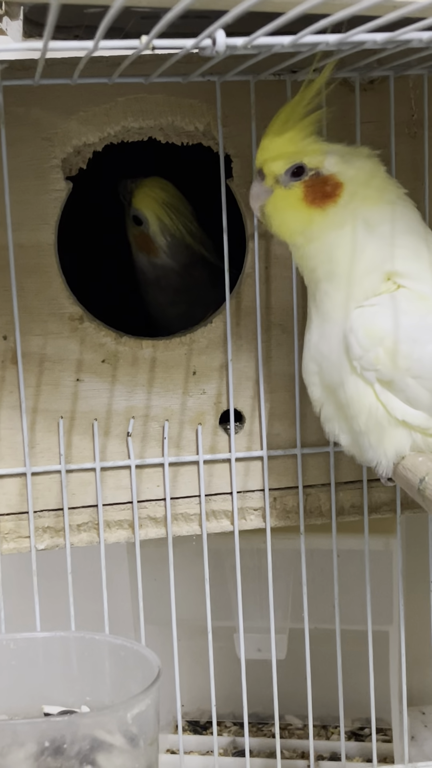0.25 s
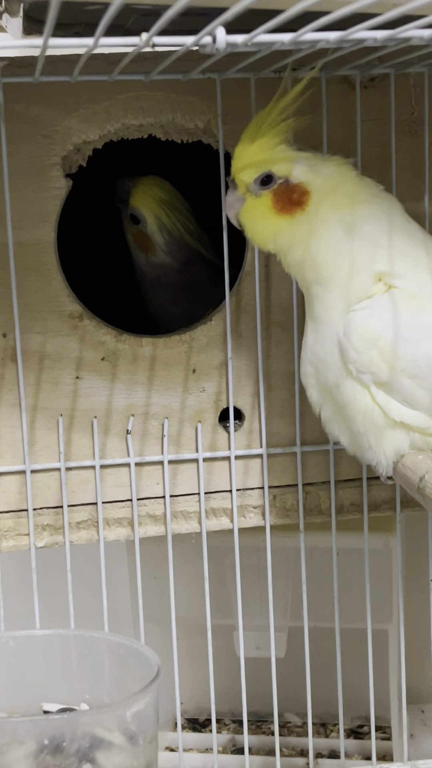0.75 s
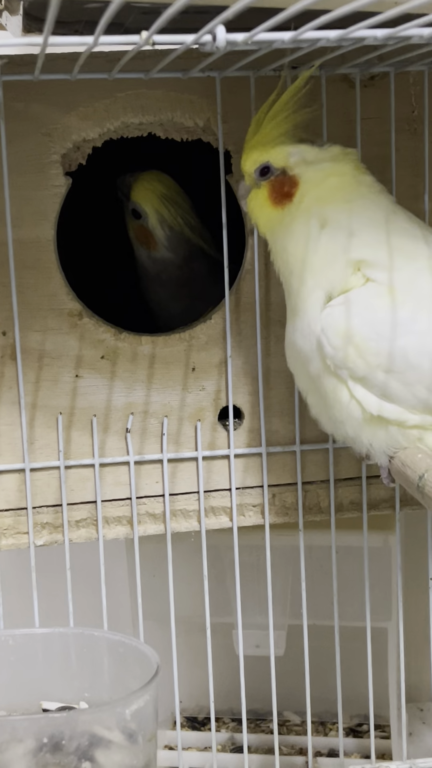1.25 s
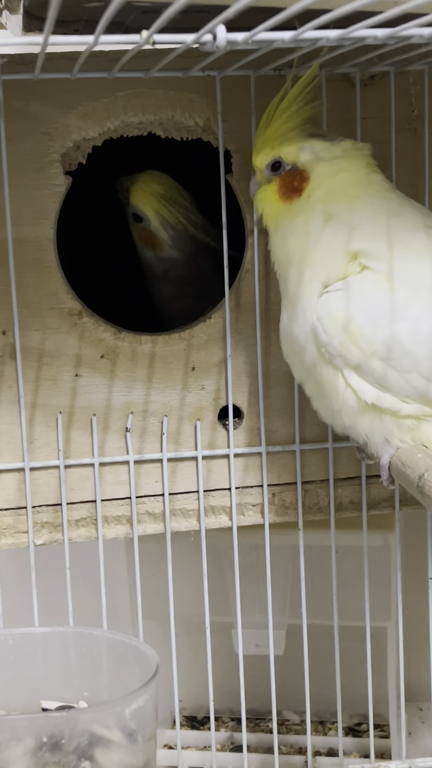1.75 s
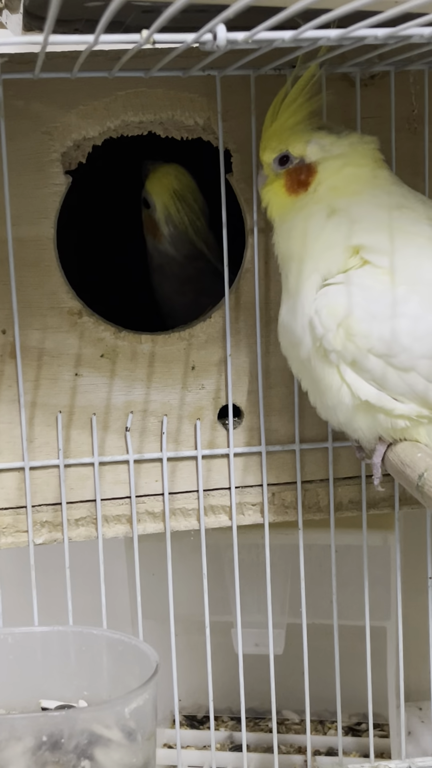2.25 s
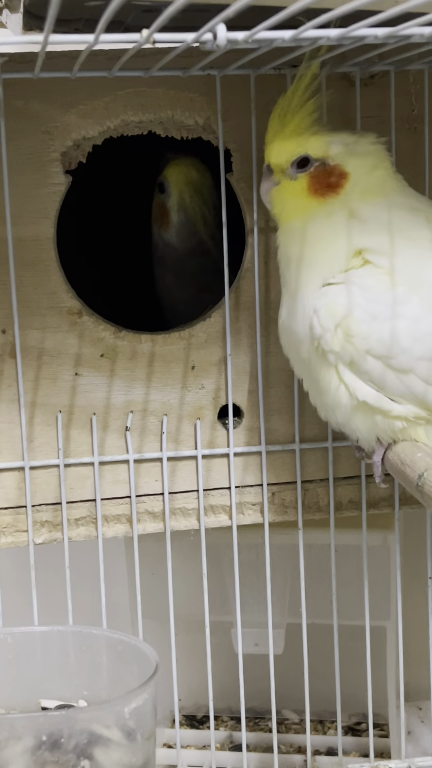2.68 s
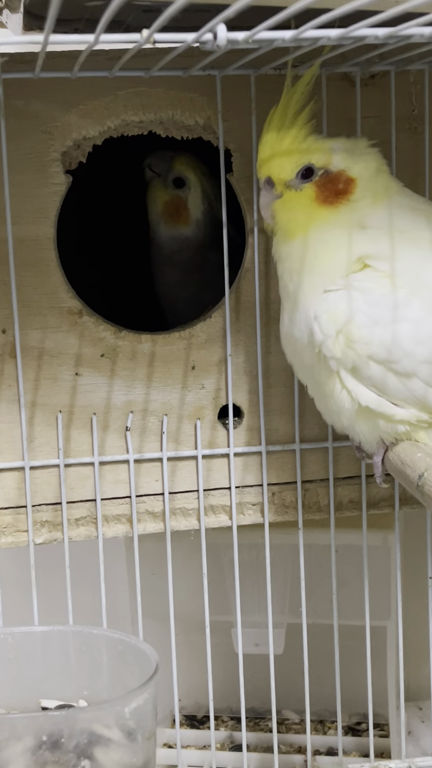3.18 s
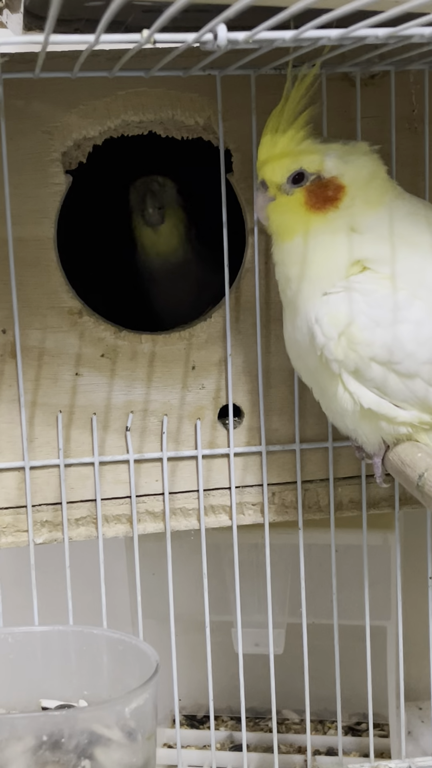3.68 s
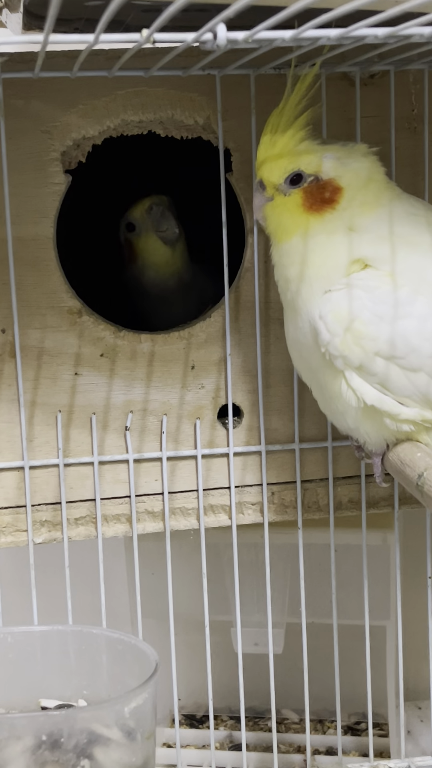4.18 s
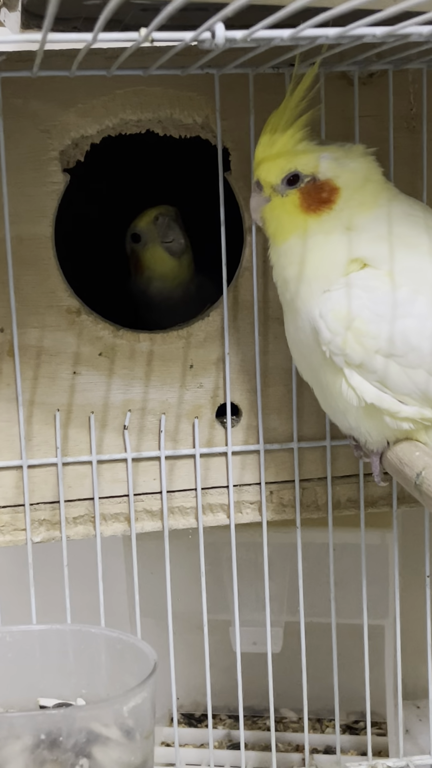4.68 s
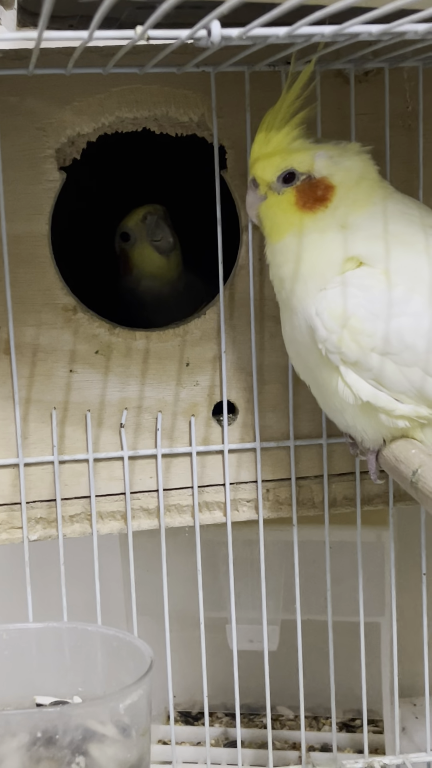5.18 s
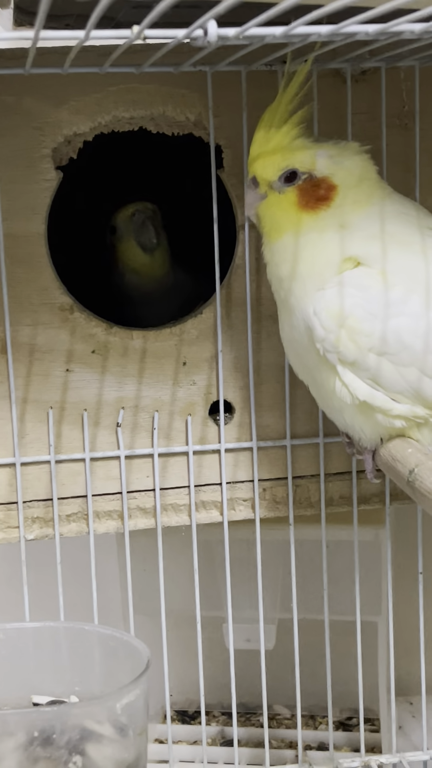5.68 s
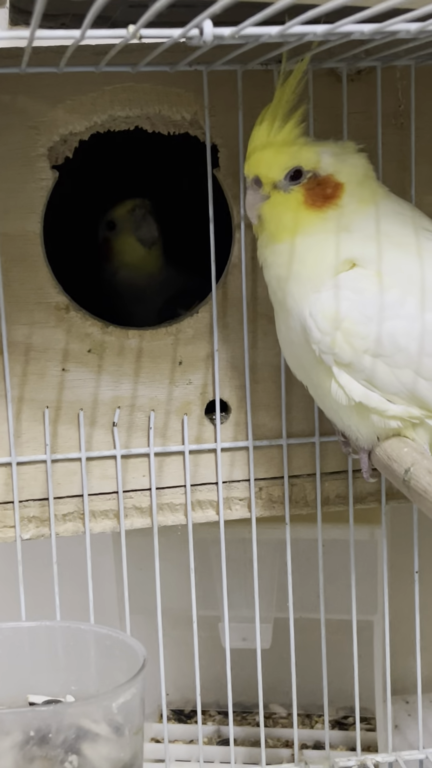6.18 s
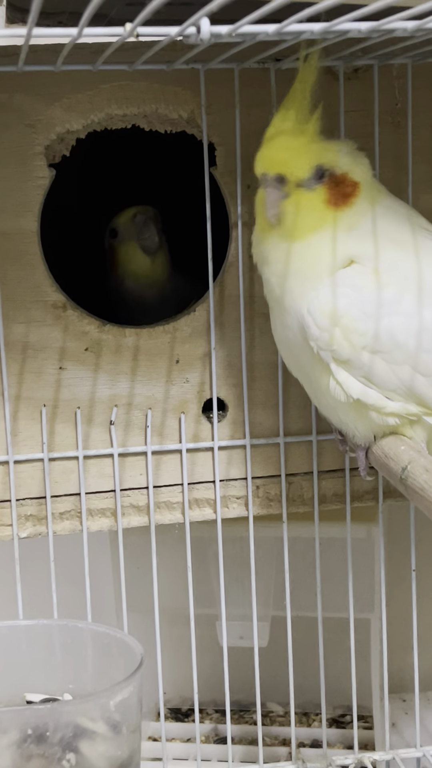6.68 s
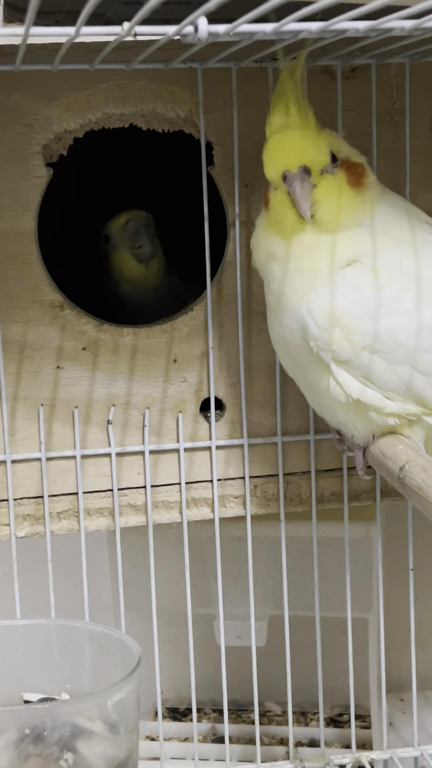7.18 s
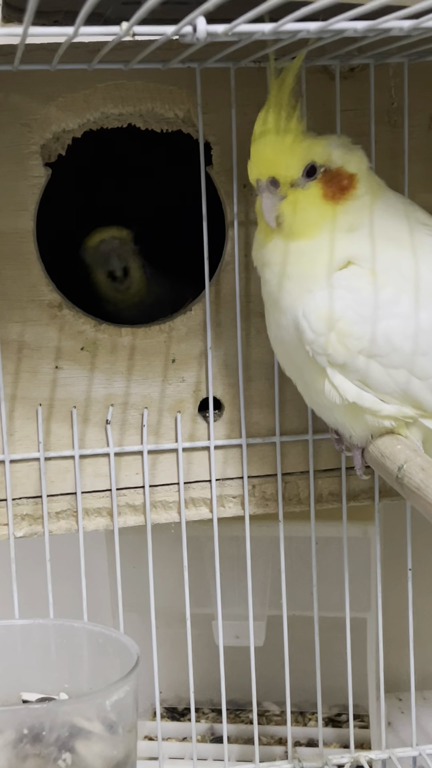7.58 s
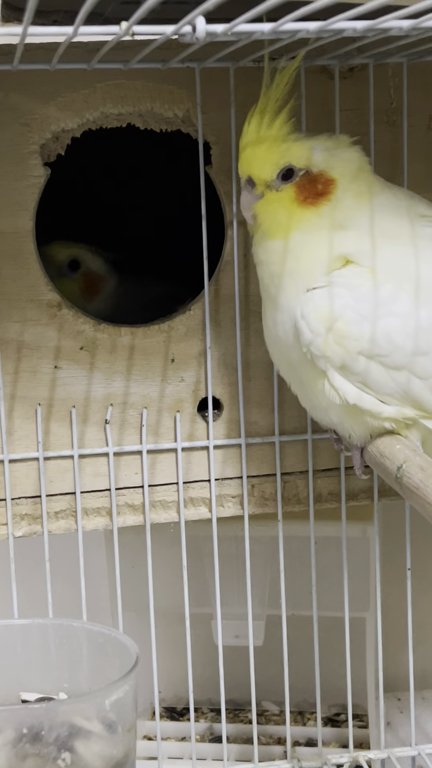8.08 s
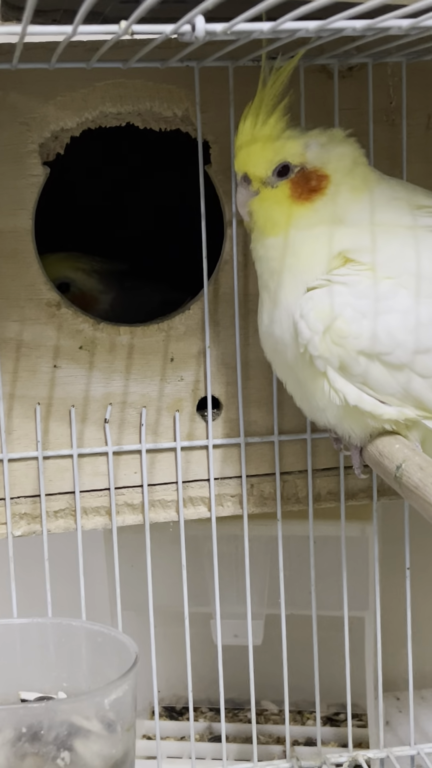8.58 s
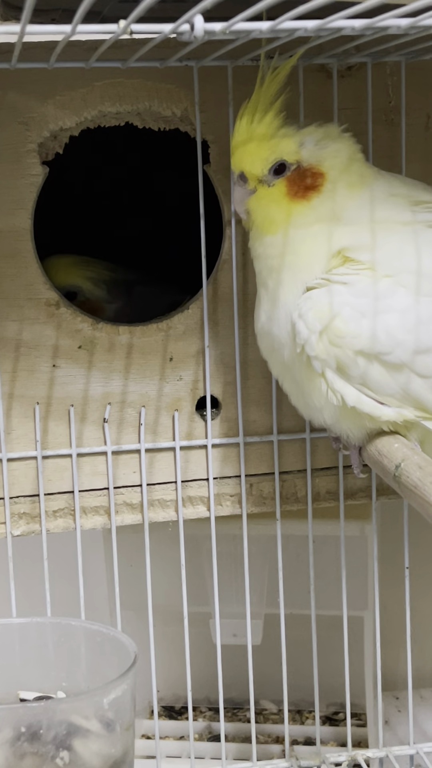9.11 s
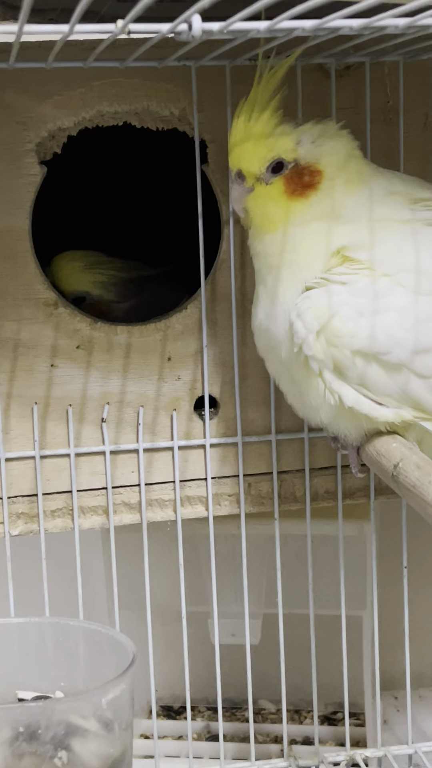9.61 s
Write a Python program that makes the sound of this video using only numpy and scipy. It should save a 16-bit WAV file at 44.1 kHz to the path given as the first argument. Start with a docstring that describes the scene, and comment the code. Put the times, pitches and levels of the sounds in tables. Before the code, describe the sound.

A cockatiel sings beside a wooden nest box in a wire cage, close to a stereo microphone in a hard-walled room. From 0 to about 5.1 seconds it delivers a steady run of short notes, roughly four a second: an opening high peep that collapses raspily downward, then scoops, falling slurs, bright ringing chirps and softer warbles, mostly gliding around 1.3 to 2.3 kHz. A higher peep comes at 4.7 with a dull scuff. From 5.1 to 6.4 the bird pauses; the room's ring fades over a low, wavering motor hum and soft air, with a faint distant low tone at the start. Singing resumes at 6.4; a small tick and feather rustle come around 6.8. Chirps at 7.5 to 8.4 are bright, with high peeps at 6.8, 7.7, 9.1 and 9.6. Another faint far-off low glide passes near 9 seconds. Song continues to the end.

```python
"""In a hard-walled room, at a wooden nest box in a wire cage, a cockatiel sings two runs of short notes.
There are about four a second: peeps, slurs, chirps, scoops and warbles. Each is one gliding tone with
overtones, and some start or break off in a rasp made of chopped noise. The room rings after them.
Light ticks, rustles and dull scuffs are shaped noise; two faint low tones glide by, far off.
Behind it all a motor hums in wavering low tones, over the soft noise of the still room."""
import sys
import numpy as np
from scipy import signal
from scipy.fft import rfft, irfft, next_fast_len
from scipy.io import wavfile
from scipy.ndimage import uniform_filter1d, map_coordinates

SR = 44100
rng = np.random.default_rng(int(sys.argv[2]) if len(sys.argv) > 2 else 0)


def dump(signal):
    """Clip the signal to [-1, 1] and save it as 16-bit WAV at the path in sys.argv[1]."""
    limited = np.clip(np.atleast_2d(signal).T, -1, 1)
    pcm = np.round(limited * 32767).astype(np.int16)
    wavfile.write(sys.argv[1], SR, pcm)


N = 434385
TIME = np.arange(N) / SR


def from_db(db):
    """Turn decibels into gain."""
    return 10 ** (np.asarray(db) / 20)


def rms_one(x):
    """Scale to an rms (average strength) of 1."""
    return x / np.sqrt(np.mean(np.abs(x) ** 2) + 1e-20)


def at_hz(points, hz):
    """Read a table between its points, with frequency on a log axis as the ear hears it."""
    at, value = np.transpose(points)
    return np.interp(np.log(np.maximum(hz, 1)), np.log(at), value)


def bins(size):
    """Frequencies in the spectrum of that many samples."""
    return np.arange(size // 2 + 1) * SR / size


def noise(colour):
    """Steady noise whose spectrum follows the colour table; rms 1."""
    size = next_fast_len(N)
    spectrum = rfft(rng.standard_normal(size))
    return rms_one(irfft(spectrum * from_db(at_hz(colour, bins(size))), size)[:N])


def drift(rate):
    """Smooth random wandering that changes about rate times a second; rms 1."""
    knots = rng.standard_normal(N // 40)
    return rms_one(map_coordinates(knots, [TIME * rate], order=3, mode="wrap"))


def bursts(events, rise_s, fall_s):
    """Loudness curve that swells and dies away at each event (t/s, level/dB)."""
    out = np.zeros(N)
    for s, level_db in events:
        start = max(int(s * SR), 0)
        age = TIME[:min(SR // 2, N - start)]
        rise = np.minimum(age / rise_s, 1)
        fall = np.exp(-np.maximum(age - rise_s, 0) / fall_s)
        out[start:start + len(age)] += from_db(level_db) * rise * fall
    return out


def ease(share):
    """Smooth step from 0 to 1."""
    return np.sin(np.pi / 2 * np.clip(share, 0, 1)) ** 2


def glide(s, pitch, fade_s):
    """One gliding tone: its samples, its pitch, its phase (pitch added up), and a gate with soft edges."""
    span = slice(max(int((s[0] - fade_s) * SR), 0), int((s[-1] + fade_s) * SR))
    t = TIME[span]
    hz = uniform_filter1d(np.interp(t, s, pitch), size=220, mode="nearest")
    gate = ease(np.minimum(t - t[0], t[-1] - t) / (2 * fade_s))
    return span, hz, 2 * np.pi * np.cumsum(hz) / SR, gate


# motor hum, one row per tone: (f/Hz, rms level before the swell/dB, unsteadiness 0-1)
HUM_TONES = [(36, -53, 0.09), (56.7, -46, 0.6), (82.7, -51, 0.8), (116, -46, 0.6), (186.5, -68.5, .6),
             (229.8, -52, .12), (296, -71, .5), (344.4, -66, .3)]
# the lowest hum tones swell and sink: (t/s, change of level/dB)
HUM_SWELL = [(0, -1.5), (1.5, 1.5), (3.2, -1), (4.8, 0), (7.6, -5), (9.8, 4.5)]


def motor_hum(waver_rate=14, swell_below_hz=100):
    """Low motor tones, each wavering in strength and phase."""
    out = np.zeros(N)
    swell_db = np.interp(TIME, *np.transpose(HUM_SWELL))
    for hz, level_db, unsteady in HUM_TONES:
        swing = rms_one(1 + unsteady * (drift(waver_rate) + 1j * drift(waver_rate)))
        turning = np.exp(2j * np.pi * (hz * TIME + rng.random()))
        tone = np.sqrt(2) * np.real(swing * turning)
        out += from_db(level_db + swell_db * (hz < swell_below_hz)) * tone
    return out


# colour of the still room's noise: (f/Hz, relative level per Hz/dB)
AIR_COLOUR = [(22, -20), (40, 0.5), (90, -5.5), (135, -4.5), (180, -13.5), (300, -18), (500, -24),
              (1000, -31), (2400, -37), (3500, -50), (7000, -53.5), (10000, -74), (15000, -80)]
# how alike left and right are in that noise: (f/Hz, likeness from -1 to 1)
LIKENESS = [(100, 1), (300, 0.97), (600, 0.7), (1500, 0.14), (8000, 0.72)]


def still_air(level_db=-49):
    """Dull room noise, alike in both channels in the bass and less so higher up."""
    size = next_fast_len(N)
    alike = np.clip(at_hz(LIKENESS, bins(size)), -1, 1)

    def part(share):
        return irfft(rfft(noise(AIR_COLOUR), size) * np.sqrt(share), size)[:N]

    mid, side = part((1 + alike) / 2), part((1 - alike) / 2)
    return from_db(level_db) * np.array([mid + side, mid - side])


# The five kinds of note. Each glides from an entry pitch to a turning pitch, on to a late pitch,
# then hooks off to its end pitch. Levels are relative: shape and resonances are added later.
# Columns of all five: (start t/s, length/s, entry f/Hz, turning f/Hz, late f/Hz, end f/Hz,
#   share of the length at the turn, fundamental level/dB, its swell over the note/dB, octave level/dB,
#   its swell/dB, its bloom in mid-note/dB, lift of the middle overtones/dB, lift of the highest/dB)
# high, almost pure peeps
PEEPS = [(0.001, 0.062, 2558, 2780, 2686, 2600.0, 0.53, -14.5, -9, -35.5, -7, 9.5, 4.5, 7),
         (4.735, 0.1, 2194, 2385, 2830, 2730, 0.13, -17, -11.5, -29.5, -2.0, 8, -7, 4),
         (6.845, 0.068, 2770, 2462, 2980, 2640.0, 0.23, -14.5, 2, -30, -21, -4, -3.5, -1),
         (7.73, 0.098, 2385, 2395, 2801, 2555, 0.13, -15.0, 6.5, -47, 10, -4, 12, 7.5),
         (9.06, 0.078, 2163, 2474, 2801, 2750.0, 0.3, -24.5, 16.5, -43, 12.5, 11, -6, -4),
         (9.647, 0.079, 2290, 2493, 2770, 2810, 0.3, -23, 3, -43, 2.5, 14.5, -9, -2)]
# slurs that mostly fall
SLURS = [(0.398, 0.1, 1597, 1504, 1316, 1294, 0.35, -21.5, 1, -26, -8.5, 4, -8, 4.5),
         (1.728, 0.11, 2168, 1629, 1372, 1260, 0.37, -23.5, 6, -45, 3.5, 17.5, -2.5, 19),
         (2.17, 0.091, 1528, 1357, 1302, 1427, 0.67, -23, 1.5, -25.5, -1, -1.5, -11.5, 6),
         (3.662, 0.11, 1514, 1646, 1337, 1412, 0.18, -26, 2.5, -37.0, -7.0, 1, 3.5, -7),
         (4.988, 0.11, 1633, 1481, 1362, 1654, 0.6, -28.0, -9.5, -42.5, 6.5, 12, 0.5, -4.0),
         (6.38, 0.05, 1518, 1522, 1392, 1558, 0.42, -31, -3.5, -26.5, 1, 7, 4, -11.0),
         (7.298, 0.098, 1565, 1456, 1332, 1425, 0.39, -24.5, -6.5, -22, -5, 1.5, 1.5, -5.0),
         (8.852, 0.12, 1832, 1655, 1527, 1734, 0.47, -25.5, 9, -25, -11.5, 8, 2, -5),
         (9.443, 0.12, 1800, 1560, 1336, 1305, 0.44, -24, -1, -38.5, -6.5, 22.5, -2, 10)]
# loud, bright chirps that settle on a held pitch
CHIRPS = [(0.598, 0.086, 1677, 1807, 1787, 1790, 0.54, -23.5, 13, -17, 15.0, 10, -1.5, 3.5),
          (2.376, 0.086, 2055, 1795, 1810, 1768, 0.38, -20, 9, -14, 12, -0.5, -0.5, -3.5),
          (2.792, 0.11, 2344, 1771, 1878, 1618, 0.25, -19, 2, -20.5, 24.5, -1, -5.5, 5.5),
          (4.298, 0.087, 1878, 1836, 1851, 1824, 0.28, -24, -8.5, -7.5, -5, 14, 6, -2),
          (7.508, 0.088, 2080, 1842, 1973, 2010.0, 0.37, -20.0, -4.0, -6.5, -12.5, 3.5, 6, -6),
          (7.98, 0.14, 1993, 1809, 2010, 1720.0, 0.48, -28.5, -6.5, -20, -33.5, 10.5, 8, -8.5),
          (8.406, 0.094, 2054, 1867, 1854, 1744, 0.5, -29, -20.5, -15, 4, 2, 9.5, 0.5)]
# scoops that mostly dip and climb again
SCOOPS = [(0.15, 0.1, 1598, 1564, 1771, 1720, .25, -27.5, 10.5, -54, -5, -6, 2, 14),
          (1.038, 0.08, 1784, 1626, 1743, 1728, .5, -26, -13.5, -19.5, 24, 7, -2.5, 4.5),
          (1.497, 0.13, 1783, 1592, 1833, 1702, .2, -23.5, 10, -20.5, -25, 17, -8, 8),
          (1.95, 0.086, 1627, 1735, 1681, 1616, .63, -22.5, 3.5, -32.5, 2.5, 3.5, -6.5, 13),
          (3.45, 0.129, 2216, 1595, 1654, 1793, .22, -25.5, -1.5, -26, 4, 0, 8, 6),
          (3.877, 0.104, 2186, 1544, 1722, 1756, .19, -24, 3, -25, 18, 3.5, 12, -0.5),
          (6.568, 0.13, 1697, 1577, 1730, 1700, .17, -24.5, -1, -22, -15.5, 7, 4.5, -2),
          (7.018, 0.12, 1810, 1670, 1887, 1740, .2, -24.5, -5, -31, -8.5, 12, -4.5, 5)]
# soft warbles between the louder notes
WARBLES = [(0.853, 0.1, 1830, 1589, 1595, 1700, .32, -30, -9, -58.5, -3, 1, 2, 14),
           (1.3, 0.094, 1930, 1702, 1923, 1684, .48, -23.5, -1.5, -52, 4, 0, -5, 13.5),
           (2.62, 0.097, 2230, 1768, 1826, 1770, .46, -25, 0.5, -52.5, 3, 0, 0, 14.5),
           (3.045, 0.098, 1880, 1377, 1508, 1920, .26, -24.5, -2, -61, 0.5, -10, -2.5, 8),
           (3.235, 0.11, 2280, 1957, 2193, 1990, .26, -20, 5.5, -26, 3, 19, 1.5, 13.5),
           (4.122, 0.099, 2234, 1740, 2010, 1770, .45, -24.5, -2.5, -46.5, -5.5, 1.5, 5, 5),
           (4.55, 0.106, 1900, 1495, 1915, 2160, .52, -28.5, 0.5, -56.5, 0, -13, 2.5, 0),
           (8.213, 0.1, 1400, 1270, 1387, 1340, .41, -26.5, -1.5, -59, 18, -2, -9, -5),
           (8.643, 0.075, 2300, 2216, 2190, 1630, .4, -32, 4.5, -58.5, 3.5, -7.5, 6.5, 7),
           (9.285, 0.091, 2330, 1760, 1630, 1680, .5, -35.5, -1, -58, -14.5, 0, 11, 11)]
# attack, hold and release of each kind: (share of the length, fundamental level/dB, octave level/dB)
PEEP_SHAPE = [(0.0, -15.5, -8), (0.12, -9, -13.5), (0.3, 0.5, -8), (0.6, -4, 0.0), (0.85, -3.0, -0.5),
              (1.0, -18.5, -7.5)]
SLUR_SHAPE = [(0.0, -12.5, -7.5), (0.12, -8, 0.0), (0.3, -1, -0.5), (0.6, -0.5, -4), (0.85, -2.5, -14.0),
              (1.0, -8.5, -24)]
CHIRP_SHAPE = [(0.0, -12, -24), (0.12, -5.5, -10.0), (0.3, -1, -1.0), (0.6, 1, 1.5), (0.85, 0.5, -1),
               (1.0, -19.0, -20)]
SCOOP_SHAPE = [(0.0, -11.5, -15.0), (0.12, -6.5, -8), (0.299, -4.5, 0.5), (0.6, -1.5, -2), (0.85, -1, -8.5),
               (1.0, -14.5, -12.5)]
WARBLE_SHAPE = [(0.0, -16.5, -1.5), (0.12, -11, -4), (0.301, -5.0, -2.5), (0.599, 0.5, -1),
                (0.85, -4.5, -1.5), (1.0, -11, -9)]
# the voice catches for an instant: (t/s, dip of the pitch as a share, dip of the level/dB)
CATCHES = [(1.058, 0, 4), (1.608, -.04, 9), (1.795, 0.00081, 7), (2.804, -0.0015, 10), (3.277, .02, 13.5),
           (4.767, 0.087, 4), (6.863, 0.018, 6), (7.76, .03, 3), (9.104, 0.033, 9.5), (9.684, 0.029, 3.5)]


def song(grid_size=80, hook_share=.8, catch_s=0.0038):
    """Each note as times, pitch, levels of fundamental and octave, and the two overtone lifts."""
    share = np.linspace(0, 1, grid_size)
    # the closing hook begins at hook_share of the note
    hook = np.clip((share - hook_share) / (1 - hook_share), 0, 1) ** 2
    catch_at, catch_dip, catch_db = np.transpose(CATCHES)
    kinds = [(PEEPS, PEEP_SHAPE), (SLURS, SLUR_SHAPE), (CHIRPS, CHIRP_SHAPE),
             (SCOOPS, SCOOP_SHAPE), (WARBLES, WARBLE_SHAPE)]
    for notes, shape in kinds:
        at, first_shape, second_shape = np.transpose(shape)
        for (start, length, entry_hz, turn_hz, late_hz, end_hz, turn,
             first_db, first_swell, second_db, second_swell, bloom, middle_db, top_db) in notes:
            s = start + length * share
            onward = (share - turn) / max(hook_share - turn, 1 / grid_size)
            pitch = entry_hz + (turn_hz - entry_hz) * ease(share / turn)
            pitch += (late_hz - turn_hz) * ease(onward) + (end_hz - late_hz) * hook
            first = first_db + first_swell * (share - .5) + np.interp(share, at, first_shape)
            second = second_db + second_swell * (share - .5) + np.interp(share, at, second_shape)
            second -= bloom * (2 * share - 1) ** 2
            caught = np.exp(-((s[:, None] - catch_at) / catch_s) ** 2)
            dip_db = caught @ catch_db
            yield s, pitch * (1 - caught @ catch_dip), first - dip_db, second - dip_db, middle_db, top_db


# throat and beak, as they colour the overtones above the octave: (f/Hz, level/dB)
THROAT = [(3800, -31), (4400, -5), (4900, -28.5), (5500, -13.5), (6300, -22.5), (7300, -16.5), (8200, -34),
          (9200, -52.5), (10200, -31), (11200, -23), (12400, -31), (13800, -27), (15500, -34)]
# resonances of beak and nest box that fundamental and octave slide through: (f/Hz, level/dB)
BOX = [(1200.0, -24), (1330.0, 1), (1480.0, -11), (1620.0, 3), (1800.0, 5.5), (1950.0, -2), (2100.0, 6.5),
       (2330.0, -2.3), (2490.0, -3), (2620.0, 10), (2900.0, 5.5), (3120.0, 9), (3300.0, 6), (3500.0, 2.5),
       (3680.0, 0.7), (3900.0, -2.3), (4300.0, -3.5)]
# colour of the air in the voice, and of the rasp: (f/Hz, relative level per Hz/dB)
RASP_COLOUR = [(400, -30.5), (900, -23), (1300, -0.5), (2600, 3), (3800, -2), (4900, -13.5), (6000, -12),
               (7600, -21), (9200, -59), (11500, -46.5), (15000, -61)]


def whistle(fade_s=0.0022, jitter_rad=0.15, weak_jitter_rad=0.28, steady_db=-22, sag=0.022, sag_s=0.0028,
            wander=0.0057, wander_rate=60, shimmer_db=2.34, overtone_flutter_db=4.0, slope_db=-5.5,
            fundamental_db=0.22, octave_db=-0.3, air_db=-54, full_drive_db=2.5,
            middle_fade=.08, top_fade=0.69, top_hz=9000, count=8):
    """The voice organ makes one gliding tone per note; its partials swell as they cross the resonances."""
    out, effort = np.zeros(N), np.zeros(N)
    waver, shake, stray = jitter_rad * drift(180), drift(420), wander * drift(wander_rate)
    flutter = [drift(130) for k in range(count)]
    for s, pitch, first_db, second_db, middle_db, top_db in song():
        span, hz, phase, gate = glide(s, pitch, fade_s)
        t = TIME[span]
        # the pitch strays a little and sags as the pressure ends
        end_sag = sag * np.exp(np.minimum(t - s[-1], 0) / sag_s)
        hz = hz * (1 + stray[span] - end_sag)
        first = np.interp(t, s, first_db) + at_hz(BOX, hz) + fundamental_db
        second = np.interp(t, s, second_db) + at_hz(BOX, 2 * hz) + octave_db
        # a weakly blown tone shakes
        weakness = np.clip((steady_db - np.maximum(first, second)) / 10, 0, 1)
        phase = 2 * np.pi * np.cumsum(hz) / SR + waver[span] + weak_jitter_rad * weakness * shake[span]
        levels = [first + shimmer_db * flutter[0][span], second + shimmer_db * flutter[1][span]]
        # upper overtones grow with the lower two; the highest fade most away from the note's height
        drive = (first + second) / 2
        slack_db = np.maximum(drive.max() - drive - full_drive_db, 0)
        middle_lift, top_lift = middle_db - middle_fade * slack_db, top_db - top_fade * slack_db
        for k, wobble in enumerate(flutter[2:], 3):
            lift = np.where(k * hz < top_hz, middle_lift, top_lift)
            colour = at_hz(THROAT, k * hz) + lift
            levels.append(drive + slope_db * (k - 3) + colour + overtone_flutter_db * wobble[span])
        for k, level_db in enumerate(levels, 1):
            strength = uniform_filter1d(from_db(level_db), size=110, mode="nearest")
            out[span] += gate * strength * np.sin(k * phase) * (k * hz < SR / 2)
        effort[span] = gate * np.sqrt(from_db(first) + from_db(second))
    breath = from_db(air_db) * effort * noise(RASP_COLOUR)
    return out + breath


# the voice turns rough: (t/s, level/dB)
RASPS = [(0.06, -31.5), (1.732, -45.5), (3.45, -33), (3.664, -29.5), (3.879, -39.5), (4.55, -34.5),
         (4.827, -32.5), (4.998, -33), (5.084, -46), (6.845, -34), (7.83, -35), (9.655, -40)]


def rasp(onset_db=-36, onset_follows=.55, flap_hz=620, flap_spread=0.25, depth=0.28):
    """As a note starts or breaks, the membranes flap unevenly and chop the air into puffs."""
    onsets = []
    for s, pitch, first, second, *lifts in song():
        loudest_db = np.maximum(first, second).max()
        onsets.append((s[0], onset_db + onset_follows * loudest_db))
    envelope = bursts(RASPS, rise_s=0.0066, fall_s=0.0084) + bursts(onsets, rise_s=0.0027, fall_s=0.013)
    uneven_hz = flap_hz * (1 + flap_spread * drift(200))
    flaps = 1 + depth * np.sin(2 * np.pi * np.cumsum(uneven_hz) / SR)
    return envelope * rms_one(flaps * noise(RASP_COLOUR))


# some high notes end by collapsing about an octave: (t/s, level/dB)
COLLAPSES = [(0.062, -31), (7.826, -38.5)]


def collapses(length_s=.025, from_hz=2650, to_hz=1210, glide_s=0.0078, octave_db=-19):
    """The tension lets go at the end of a peep and the tone plunges."""
    out, age = np.zeros(N), TIME[:int(length_s * SR)]
    pitch = to_hz + (from_hz - to_hz) * np.exp(-age / glide_s)
    for s, level_db in COLLAPSES:
        span, hz, phase, gate = glide(s + age, pitch, fade_s=0.001)
        tone = np.sin(phase) + from_db(octave_db) * np.sin(2 * phase)
        out[span] += gate * from_db(level_db) * tone
    return out


# feathers and feet rustle as the bird shifts: (t/s, level/dB)
RUSTLES = [(0.1, -50.5), (2.02, -53.5), (3.12, -56), (3.88, -55), (4.78, -52), (5.85, -75), (6.8, -49),
           (7.1, -58), (8.85, -66.5)]


def rustle(grain_db=3.2, grain_rate=120):
    """Soft, uneven brushing in the middle treble: noise whose level flickers."""
    # (f/Hz, relative level per Hz/dB)
    colour = [(500, -8), (1000, -11.5), (2000, -1), (3000, 0.0), (6300, -10), (7800, -15), (9300, -45)]
    grain = from_db(grain_db * drift(grain_rate))
    return bursts(RUSTLES, rise_s=0.055, fall_s=0.11) * grain * noise(colour)


# light ticks of beak or claw: (t/s, level/dB)
TICKS = [(0.136, -44.5), (6.808, -37), (7.137, -45)]
# their colour: (f/Hz, relative level per Hz/dB)
TICK_COLOUR = [(500, -15.5), (1500, -6), (4000, -6), (6200, -0.5), (8000, -10.5), (9300, -42),
               (15000, -44.5)]


def ticks():
    """Small hard contacts that die within milliseconds."""
    return bursts(TICKS, rise_s=.0005, fall_s=0.0046) * noise(TICK_COLOUR)


# the voice cracks down to about half its pitch: (t/s, level/dB)
CRACKS = [(1.626, -44), (8.112, -46), (1.733, -43), (2.265, -46), (2.626, -46.5), (3.045, -39),
          (3.118, -44.5), (3.668, -41.5), (4.122, -48.5), (4.566, -36.5), (5.0, -44.5), (5.08, -48),
          (7.128, -45), (8.648, -46.5), (9.286, -49), (9.548, -51.5)]


def cracks(half_pitch_hz=1130, unsteady=.04, third_db=-3):
    """For a moment every second swing differs, which sounds the half pitch and its third harmonic."""
    phase = 2 * np.pi * np.cumsum(half_pitch_hz * (1 + unsteady * drift(250))) / SR
    odd = np.sin(phase) + from_db(third_db) * np.sin(3 * phase)
    return bursts(CRACKS, rise_s=0.0067, fall_s=0.009) * odd


# dull scuffs, probably feet on the floor of the box: (t/s, level/dB)
SCUFFS = [(2.03, -64), (3.7, -64), (4.56, -65), (4.77, -52.5), (5.07, -63.5), (7.1, -66), (7.76, -64)]


def scuffs():
    """Short, low brushing on wood."""
    # (f/Hz, relative level per Hz/dB)
    colour = [(250, -20), (450, -2), (620, 0), (900, -7), (1500, -22), (4000, -55)]
    return bursts(SCUFFS, rise_s=.015, fall_s=.05) * noise(colour)


# two faint low tones glide by, far off; each is a list of points: (t/s, f/Hz, level/dB)
FAR_TONES = [
    [(5.07, 471, -61), (5.15, 540, -55), (5.24, 575, -66)],
    [(8.8, 399.6, -58.5), (8.95, 531, -59), (9.08, 518, -60.5), (9.23, 410, -64)],
]


def far_tones(blur_rad=1.8):
    """Faint glides, blurred by distance: their phase wanders."""
    out = np.zeros(N)
    for tone in FAR_TONES:
        s, pitch, level_db = np.transpose(tone)
        span, hz, phase, gate = glide(s, pitch, fade_s=0.057)
        strength = from_db(np.interp(TIME[span], s, level_db))
        out[span] += gate * strength * np.sin(phase + blur_rad * drift(45)[span])
    return out


def near_walls(x, echo_db=-17, gap_s=0.0024, fall_s=0.006):
    """Quick reflections off box and cage; they beat against a gliding tone and leave a held one smooth."""
    age = TIME[:SR // 20]
    echoes = rng.standard_normal(len(age)) * np.exp(-age / fall_s) * (age > gap_s)
    return x + from_db(echo_db) * signal.fftconvolve(x, echoes / np.linalg.norm(echoes))[:N]


# how long the room rings: (f/Hz, time to fall by 60 dB/s)
ROOM_T60 = [(500, 0.95), (1800, 0.7), (3500, 0.75), (6000, .66), (11000, 0.23), (15000, .25)]
# strength of that ring: (f/Hz, level/dB)
ROOM_DB = [(500, -9), (1800, -14), (3500, -19), (6000, -14.5), (11000, -20.5), (15000, -18.5)]


def room_response(gap_s=0.0043, build_s=0.035):
    """Dense reflections that build up, then die band by band; the treble goes first."""
    age = TIME[:SR]
    build = 1 - np.exp(-np.maximum(age - gap_s, 0) / build_s)
    edges = np.geomspace(400, 16000, 11)
    white, out = rng.standard_normal((2, SR)), np.zeros(SR)
    for k, (low, high) in enumerate(zip(edges, edges[1:])):
        centre = np.sqrt(low * high)
        decay = build * from_db(-60 * age / at_hz(ROOM_T60, centre))
        band_filter = signal.butter(2, [low, high], "band", fs=SR, output="sos")
        band = signal.sosfilt(band_filter, white[k % 2])  # neighbouring bands use different noise
        out += band * decay / np.sqrt(np.sum(decay ** 2)) * from_db(at_hz(ROOM_DB, centre))
    return out


# phase between the two microphone ports: (f/Hz, lead of the left/radians)
PORT_PHASE = [(500, 0.91), (1700, 0.14), (2700, 0.61), (3700, 0.76), (5500, 0.82), (7200, 1.35),
              (10500, 2.2), (13000, 0)]


def in_room(x, width_db=-7):
    """Sound reaches the left port first; the ring of the room comes from all round."""
    size = next_fast_len(N + SR)
    source = rfft(x, size)
    lead = np.exp(.5j * at_hz(PORT_PHASE, bins(size)))  # half the phase on each side
    mid = source * (1 + rfft(room_response(), size))
    side = source * rfft(room_response(), size) * from_db(width_db)
    return irfft(np.array([mid * lead + side, mid / lead - side]), size)[:, :N]


def scene():
    """Bird and cage in the room, over hum and still air."""
    background = motor_hum() + still_air()
    bird = near_walls(whistle() + rasp() + collapses() + cracks())
    return in_room(bird + rustle() + ticks() + scuffs() + far_tones()) + background


def gain_control(x, threshold_db=-18, squeeze=0.38, release_db_per_s=12):
    """Loud notes turn the gain down almost at once; it creeps back afterwards."""
    power = uniform_filter1d(np.mean(x, axis=0) ** 2, size=220)
    cut_db = squeeze * np.maximum(10 * np.log10(np.abs(power) + 1e-12) - threshold_db, 0)
    # hold the largest cut so far, less what has been released since
    release_db = release_db_per_s * TIME
    held_db = np.maximum.accumulate(cut_db + release_db) - release_db
    return x * from_db(-uniform_filter1d(held_db, size=110))


def record(dry, cutoff_hz=15300):
    """Gain control, then the top is cut steeply."""
    top_cut = signal.ellip(10, .1, 80, cutoff_hz, fs=SR, output="sos")
    return signal.sosfilt(top_cut, gain_control(dry))


dry = scene()
out = record(dry)
dump(out)
```